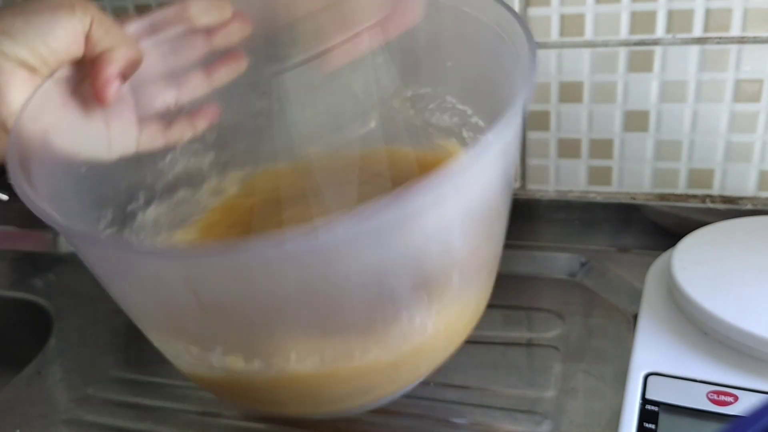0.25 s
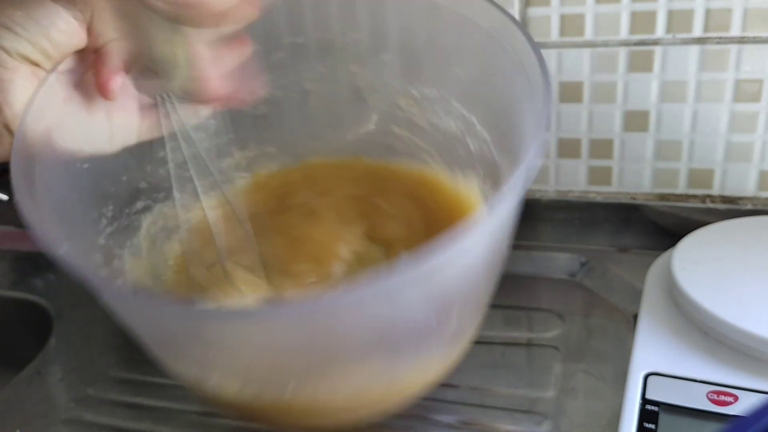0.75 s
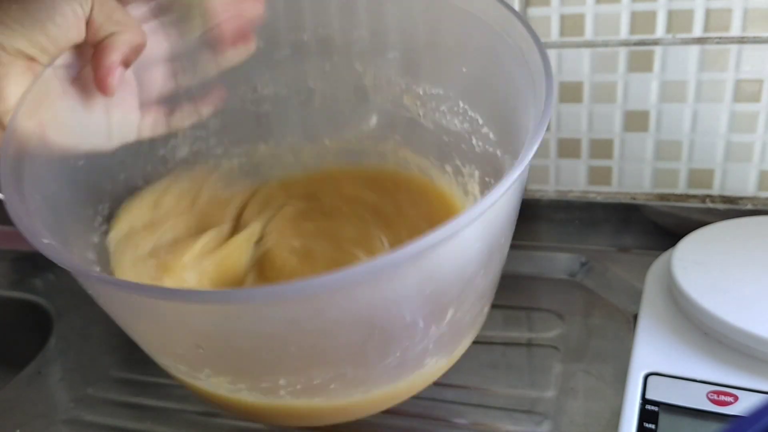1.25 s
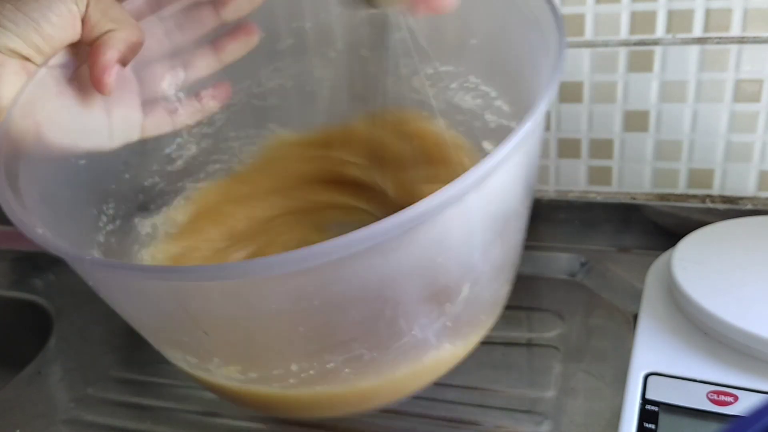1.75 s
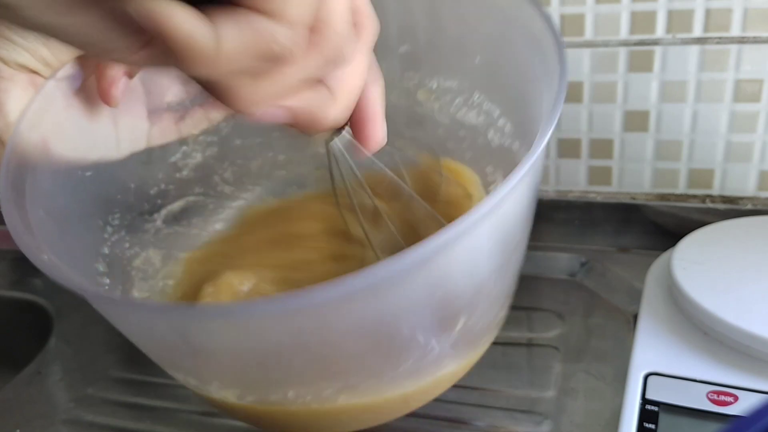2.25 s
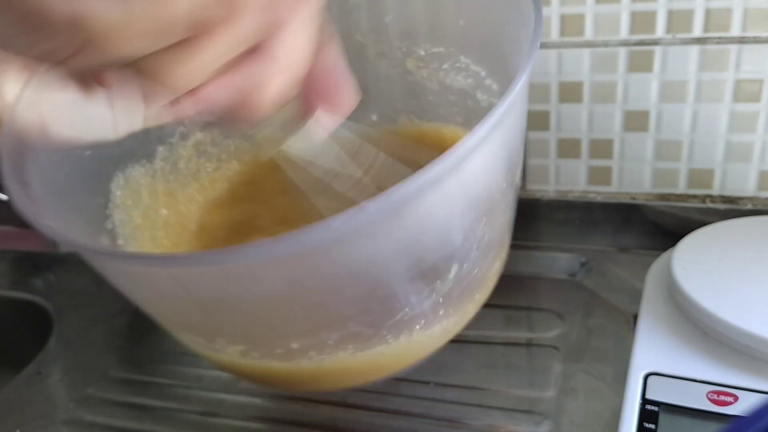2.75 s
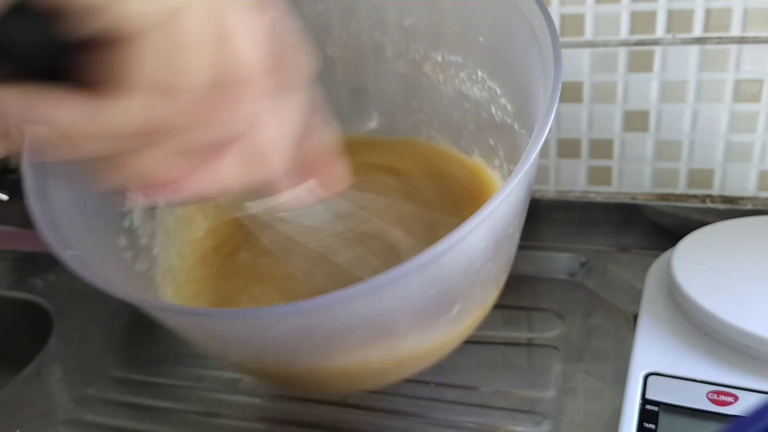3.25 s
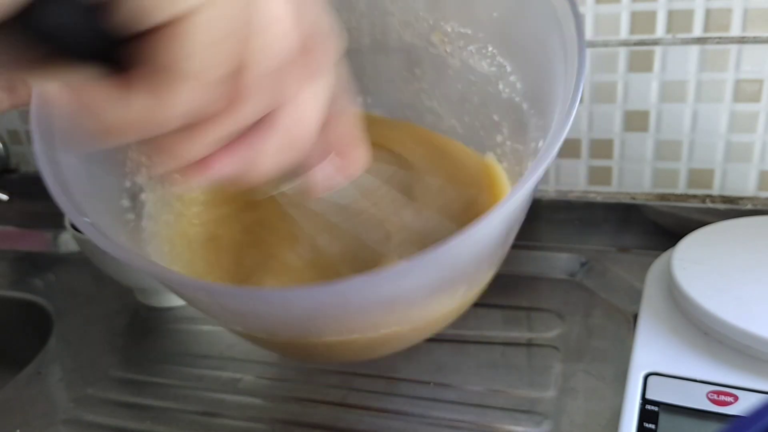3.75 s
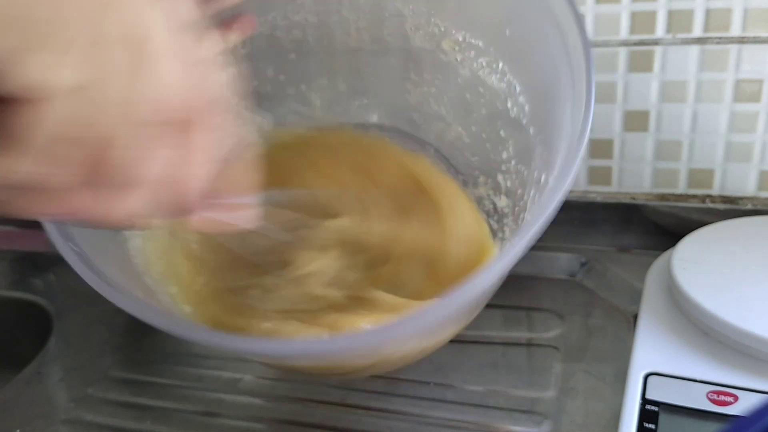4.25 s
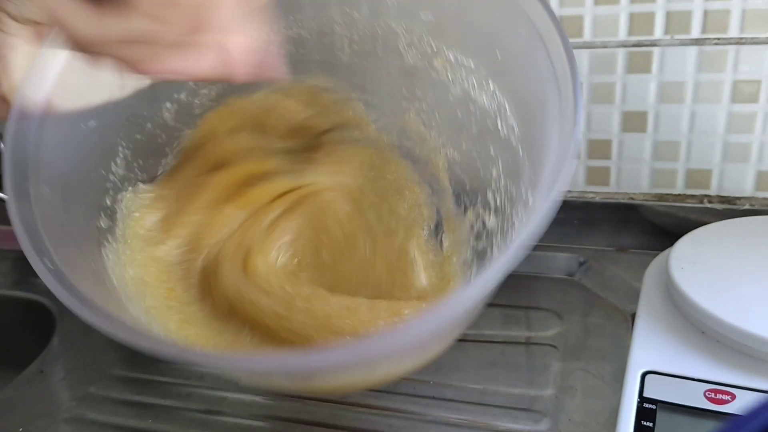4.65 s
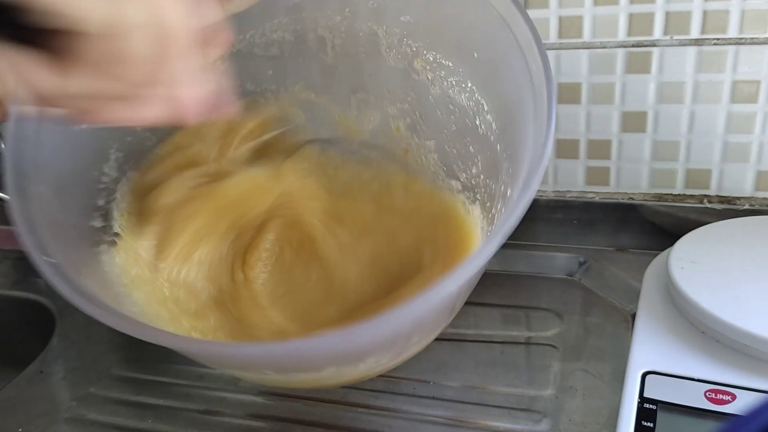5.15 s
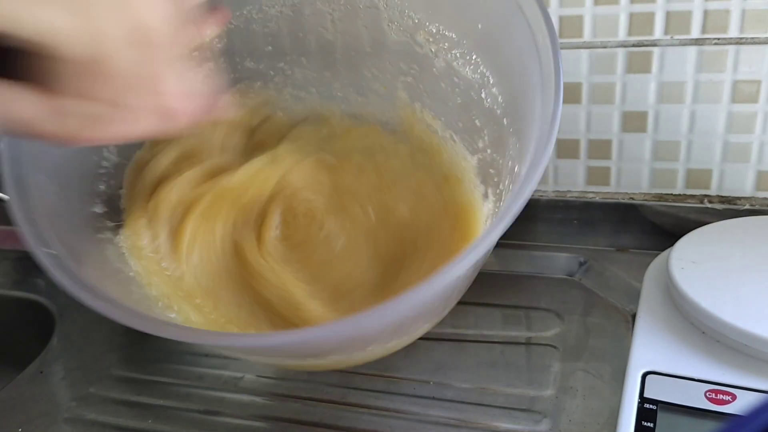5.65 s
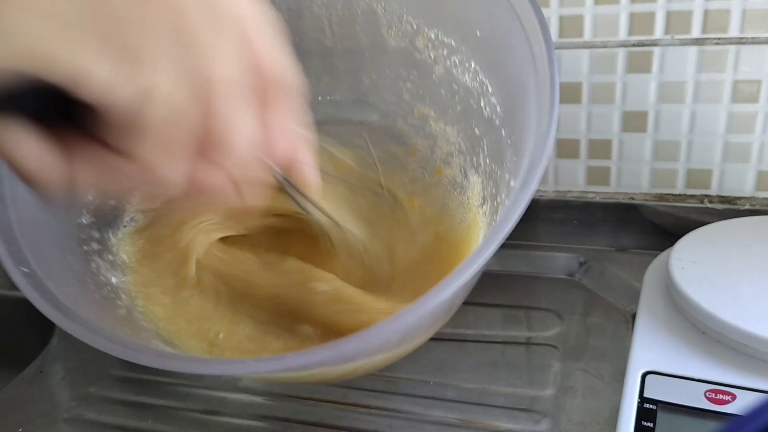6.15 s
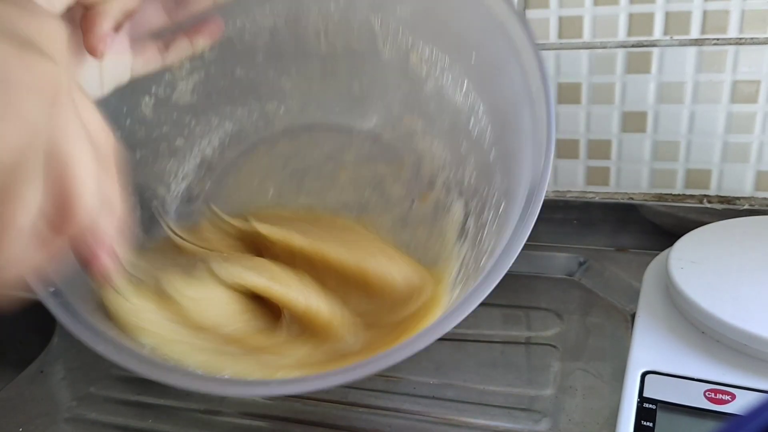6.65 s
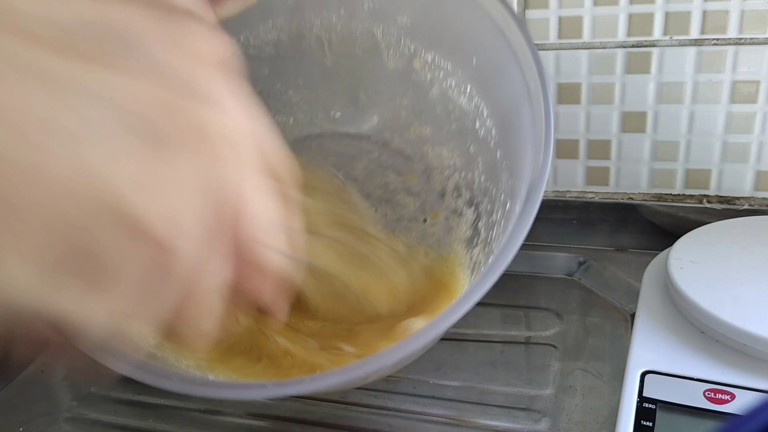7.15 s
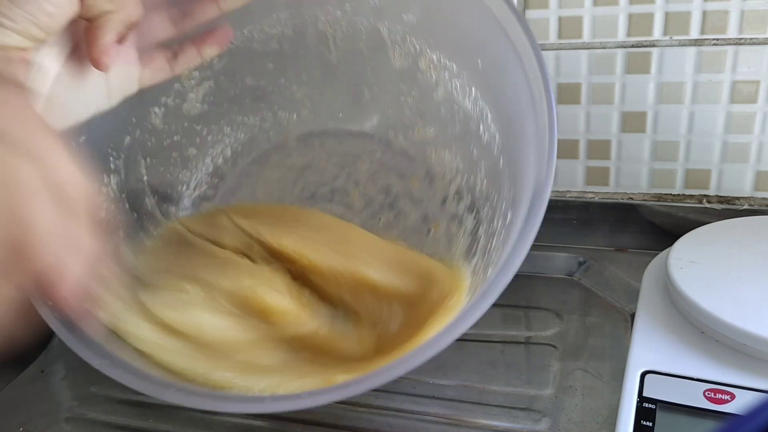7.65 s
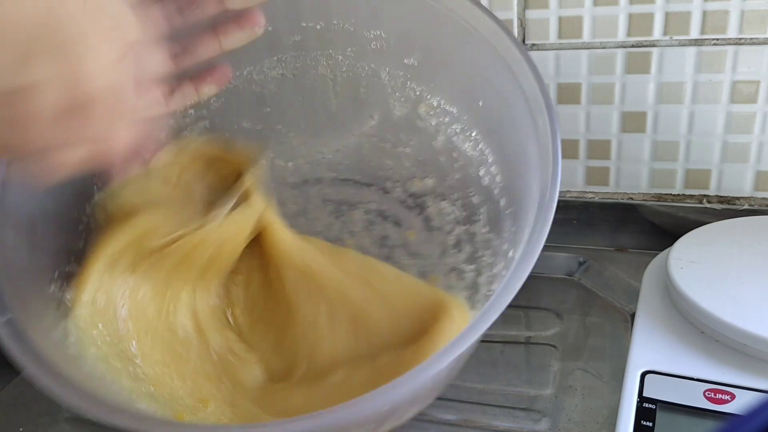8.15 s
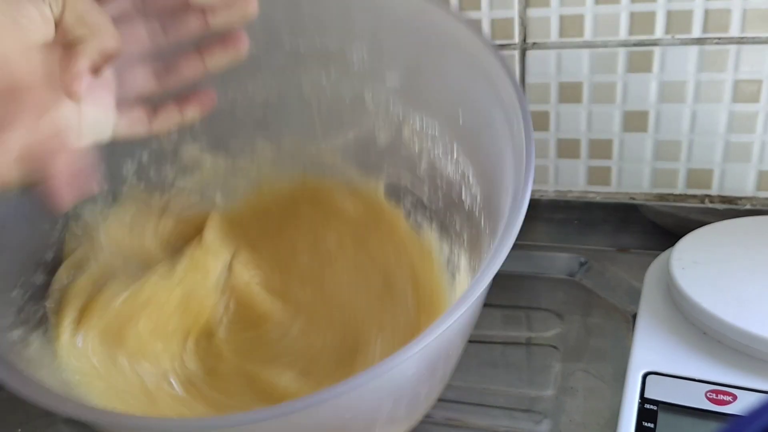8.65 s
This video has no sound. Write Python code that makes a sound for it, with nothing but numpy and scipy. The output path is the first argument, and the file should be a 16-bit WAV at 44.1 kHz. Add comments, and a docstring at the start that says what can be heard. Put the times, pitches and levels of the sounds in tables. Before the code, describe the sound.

A wire whisk beats eggs and sugar in a plastic bowl throughout, at four to five turns a second, heard close up in a tiled kitchen with a short echo. For the first 2.4 seconds it goes side to side: wires clack on the plastic, sugar hisses grittily and the batter churns with small gulps and soft low thuds. From about 2.4 seconds it circles, giving a smoother rhythmic scrape and slurp with few knocks. Tiny squeaks come near 2.3, 3.4 and 5.2 seconds. At 3.3 seconds the bowl bumps hard on a steel draining board with a short, low boom. From 6.3 seconds the whisk lifts and plunges, slapping the batter with wet plops while its loops tick together. At about 8.4 seconds there is a dull thump and the side-to-side clacking returns until the end, near 9 seconds.

```python
"""A wire whisk beats eggs and sugar in a hand-held plastic bowl, in a tiled kitchen, 4-5 turns a second.
It starts from side to side: the wires clack on the bowl, rub its wall, grind sugar and churn the batter.
At 2.3 s comes the first of a few squeaks, and from 2.4 s the whisk goes in circles. At 3.3 s the bowl
bumps hard on the steel draining board. From 6.3 s the whisk lifts and plunges, slapping the batter while
its loops tick together. From 8.4 s it beats from side to side again. A phone listens from close by."""
import sys
import numpy as np
from scipy import signal
from scipy.fft import rfft, irfft
from scipy.io import wavfile
from scipy.ndimage import uniform_filter1d

SR = 44100
rng = np.random.default_rng(int(sys.argv[2]) if len(sys.argv) > 2 else 0)


def wav_record(signal):
    """Record a signal, one row per channel, as 16-bit PCM in the file named by sys.argv[1]."""
    frames = np.transpose(np.atleast_2d(signal))
    bounded = np.clip(frames, -1, 1)
    # unit amplitude maps onto the largest positive 16-bit level
    quanta = np.round(bounded * 32767).astype(np.int16)
    wavfile.write(sys.argv[1], SR, quanta)


N = 392049
TIME = np.arange(N) / SR


def undb(db):
    """Turn decibels into a number to multiply by."""
    return 10 ** (np.asarray(db) / 20)


def unit(x):
    """Scale a signal to an average strength (rms) of 1."""
    return x / np.sqrt(np.mean(x ** 2))


def drift(rate):
    """A smooth random wobble that changes about rate times a second."""
    hold = max(2, int(SR / rate))
    steps = np.repeat(rng.standard_normal(N // hold + 1), hold)
    return unit(uniform_filter1d(steps, hold)[:N])


def swell(middle_s, length_s, time):
    """A bell-shaped rise and fall, length_s wide at half height."""
    return np.exp(-np.log(2) * np.minimum((2 * (time - middle_s) / length_s) ** 2, 100))


def fade(t, ring_s):
    """A ring dying away: 60 dB quieter after ring_s."""
    return np.exp(-np.log(1000) * t / ring_s)


def ring(force, resonances):
    """Shake an object that favours some pitches, its resonances: pitch_hz, width_hz, level_db."""
    size = 4096
    hz = np.arange(size // 2 + 1) * SR / size
    power = sum(undb(db) ** 2 / (1 + (2 * (hz - f) / width) ** 2) ** 2 for f, width, db in resonances)
    cepstrum = irfft(np.log(power) / 2)
    cepstrum[1:size // 2] *= 2  # folded so the ring comes after the push, never before
    cepstrum[size // 2 + 1:] = 0
    response = irfft(np.exp(rfft(cepstrum)))
    return signal.fftconvolve(force, response / np.linalg.norm(response))[:N]


def moving_ring(force, pitch_hz, width_hz):
    """Shake a single resonance whose pitch moves."""
    carrier = np.exp(2j * np.pi * np.cumsum(pitch_hz) / SR)
    pole = np.exp(-np.pi * width_hz / SR)
    slow = signal.lfilter([(1 - pole) ** 2], [1, -2 * pole, pole ** 2], force / carrier)
    return np.real(carrier * slow) * np.sqrt(8 * SR / (np.pi * width_hz))


def strike(hits, tones, contact_s):
    """Soft hits set an object's tones ringing; neighbouring tones swing opposite ways."""
    t = np.arange(SR // 2) / SR
    boom = sum((-1) ** k * undb(db) * fade(t, ring_s) * np.sin(2 * np.pi * hz * t)
               for k, (hz, db, ring_s) in enumerate(tones))
    force = np.zeros(N)
    for start, db in hits:
        force[int(start * SR)] = undb(db)
    return signal.fftconvolve(force, boom * (1 - np.exp(-t / contact_s)))[:N]


def blows(hits, chatter_db=4.5):
    """The force of whisk hits: one wire loop lands and its neighbours chatter after it."""
    force = np.zeros(N + SR)
    t = np.arange(SR // 20) / SR
    for start, db, chatter_s in hits:
        chatter = rng.laplace(size=len(t)) * np.sqrt(t) * np.exp(-t / chatter_s)
        blow = undb(chatter_db) * chatter / np.linalg.norm(chatter)
        blow[0] += 1
        at = int(start * SR)
        force[at:at + len(t)] += undb(db) * blow / np.linalg.norm(blow)
    return force[:N]


def notes(rows, waver, glide):
    """Short wavering notes; each second they rise by glide times their pitch."""
    out = np.zeros(N)
    clock = np.cumsum(1 + waver * drift(300)) / SR
    for middle, length, hz, db in rows:
        near = slice(max(int((middle - .1) * SR), 0), int((middle + .1) * SR))
        t = clock[near] - clock[int(middle * SR)]
        loudness = undb(db) * np.sqrt(2 * swell(middle, length, TIME[near]))
        out[near] += loudness * np.sin(2 * np.pi * hz * (t + glide * t ** 2 / 2))
    return out


def house_noise(level_db, top_hz):
    """The faint, dull noise of the house."""
    low_band = signal.butter(1, [50, top_hz], "band", fs=SR, output="sos")
    return undb(level_db) * unit(signal.sosfilt(low_band, rng.standard_normal(N)))


# how long the kitchen echoes, from low to high: pitch_hz, ring_s
ECHO_TIMES = [(150, 0.45), (530, 0.32), (1400, 0.27), (3000, 0.25), (7000, 0.23)]
def kitchen(sound, echo_db, build_s):
    """Sound bounces off tiles and steel; the echoes shift as hand and bowl circle."""
    t = np.arange(SR // 2) / SR
    hz = np.arange(len(t) // 2 + 1) * SR / len(t)
    centres_hz, ring_times = np.transpose(ECHO_TIMES)
    angle = 2 * np.pi * np.interp(TIME, np.array(WHISK_TURNS)[:, 0], np.arange(len(WHISK_TURNS)))
    echo = 0
    for facing in np.cos(angle), np.sin(angle):
        noise, tail = rfft(rng.standard_normal(len(t))), 0
        for share, ring_s in zip(np.eye(len(centres_hz)), ring_times):
            band = irfft(noise * np.interp(hz, centres_hz, share), len(t))
            tail += band * fade(t, ring_s)
        tail *= np.minimum(t / build_s, 1) ** 2
        echo += signal.fftconvolve(sound * facing, tail / np.linalg.norm(tail))[:N]
    echo_gain = undb(echo_db)
    return (sound + echo_gain * echo) / np.sqrt(1 + echo_gain ** 2)


# the bowl jolts in the hand: start_s, level_db
HAND_JOLTS = [(.5, -38), (.93, -28), (1.025, -22), (1.15, -28), (1.24, -29), (1.392, -22.5), (1.84, -35),
              (2.53, -28), (8.462, -13)]
def hand_jolts():
    """The bowl jolts against the hand, which stops the two low tones at once."""
    return strike(HAND_JOLTS, [(68, -0.29, 0.024), (126, -1.1, 0.034)], contact_s=0.0033)


# the bowl meets the draining board: start_s, level_db
BOARD_BUMPS = [(2.305, -35), (3.294, -10)]
# tones of the board with the bowl on it: pitch_hz, level_db, ring_s
BOARD_TONES = [(106, -5, 0.22), (125, -8, 0.36), (170, -10, 0.32), (212, 1.5, 0.14), (242, -2, 0.17),
               (304, -4.5, 0.12), (420, -4.5, 0.034), (690, -5.5, 0.026), (1026, -8.5, 0.048)]
def board_bumps():
    """The steel draining board booms when the bowl bumps it, first faintly, then hard."""
    return strike(BOARD_BUMPS, BOARD_TONES, contact_s=0.00043)


# squeaks on the plastic: middle_s, length_s, pitch_hz, level_db
WIRE_SQUEAKS = [(2.273, 0.014, 1240, -23.5), (2.287, 0.0046, 1200, -17), (3.372, 0.0061, 1256, -19.5),
                (5.153, 0.0095, 1212, -23)]
def squeaks():
    """A wire sticks and slips on the wall of the bowl."""
    return notes(WIRE_SQUEAKS, waver=0.019, glide=0)


# low gulps, then higher slurps: middle_s, length_s, pitch_hz, level_db
AIR_GULPS = [(.19, 0.027, 492, -19.5), (.388, 0.018, 468, -25.5), (.598, 0.019, 497, -24.5),
             (.816, 0.023, 520, -26.5), (1.268, 0.017, 514, -30.5), (1.497, 0.013, 487, -30),
             (1.722, 0.034, 507, -30), (4.31, 0.009, 513, -24), (4.365, .03, 519, -26.5),
             (4.62, 0.03, 513, -31), (5.168, 0.02, 537, -28.5), (5.868, 0.012, 522, -27),
             (5.99, 0.0098, 508, -29.5), (6.8, 0.021, 542, -33), (6.998, 0.011, 523, -27.5),
             (7.426, 0.012, 455, -23.5), (7.63, 0.014, 383, -26.5), (7.66, 0.012, 540, -31),
             (8.08, 0.012, 504, -27), (8.58, 0.0064, 522, -20.5)]
BATTER_SLURPS = [(2.615, 0.028, 1310, -28.5), (3.025, 0.032, 1055, -30.5), (4.39, 0.023, 1270, -34),
                 (5.42, 0.036, 1325, -34), (5.56, 0.023, 1940, -37), (5.77, 0.033, 1804, -33),
                 (5.92, 0.028, 1241, -30.5), (6.03, .03, 1970, -32.5), (6.16, 0.028, 1374, -28)]
def gulps_and_slurps():
    """Air scooped under the batter gulps; batter surging round the wall slurps. Both rise in pitch."""
    gulps = undb(-2.5) * notes(AIR_GULPS, waver=0.074, glide=3.4)
    return gulps + notes(BATTER_SLURPS, waver=0.085, glide=2)


# the wire loops touch each other: start_s, level_db
LOOP_TICKS = [(6.275, -23), (6.849, -40), (6.872, -31), (6.893, -28), (6.906, -29), (7.067, -31),
              (7.108, -32), (7.274, -28.5), (7.444, -32.5), (7.473, -27), (7.488, -25.5), (7.666, -27),
              (7.682, -23), (7.696, -24), (7.869, -27), (8.075, -31.5), (8.1, -30.5), (8.309, -30),
              (8.329, -30), (8.356, -30)]
# resonances of a tick: pitch_hz, width_hz, level_db
TICK_RESONANCES = [(1830, 400, -4.5), (2230, 330, 0.5), (2720, 500, 0), (3124, 150, -3)]
def loop_ticks(chatter_s):
    """The loops tick together, muffled by batter. Gives the force and its sound."""
    force = undb(25) * blows([(start, db, chatter_s) for start, db in LOOP_TICKS])
    return force, ring(force, TICK_RESONANCES)


# the whisk lands, often after a lighter touch of its front loop: start_s, level_db
BATTER_SLAPS = [(6.57, -43), (6.6, -21.5), (6.783, -39), (6.808, -23), (6.99, -33), (7.007, -22),
                (7.195, -31), (7.209, -25), (7.398, -31.5), (7.414, -22.5), (7.605, -28.5), (7.621, -21.5),
                (7.809, -26), (7.822, -24.5), (8.009, -34.5), (8.024, -21), (8.226, -34), (8.237, -22.5)]
# resonances of the dent left in the batter: pitch_hz, width_hz, level_db
DENT_RESONANCES = [(245, 210, -8), (493, 340, -1.5), (1020, 390, -4), (1190, 250, 0), (2060, 1540, -8.5)]
def batter_slaps(chatter_s):
    """The lifted whisk slaps back into the batter with a plop. Gives the force and its sound."""
    force = undb(26.5) * blows([(start, db, chatter_s) for start, db in BATTER_SLAPS])
    return force, ring(force, DENT_RESONANCES)


# the hardest knocks on the bowl: start_s, level_db, cushion (0 bare plastic, 1 thick batter), chatter_s
BOWL_CLACKS = [(0.157, -16, 0, 0.0018), (.193, -16, 0.4, 0.004), (0.208, -20.5, 0, 0.0022),
               (0.282, -18.5, 0.67, 0.0052), (0.302, -18, 0.2, 0.0019), (.397, -25.5, 0.86, 0.0051),
               (0.428, -20.5, 0, 0.0023), (0.491, -18.5, 0.37, 0.0028), (.5, -19.5, 0.75, 0.006),
               (0.633, -24, 0.04, 0.005), (0.7, -21.5, 0.83, 0.007), (0.749, -17.5, 0.35, 0.0018),
               (.811, -27, 0.3, 0.0055), (.862, -23, 0, 0.0016), (0.928, -22.5, 0.83, 0.0044),
               (1.017, -18, 0.5, 0.0011), (1.046, -19.5, 0.82, 0.0071), (1.15, -19.5, 0.86, 0.0045),
               (1.389, -19.5, 0.6, 0.0042), (1.508, -27, 0.83, .008), (1.531, -18.5, 0, 0.0027),
               (1.609, -24, 0.7, 0.0047), (1.84, -18, 0.49, 0.0047), (1.996, -25, 0, 0.0026),
               (2.078, -17, 0.18, 0.0008), (2.163, -28.5, 0.9, .002), (2.305, -14, 0.53, 0.0033),
               (2.387, -22, 0.9, 0.02), (2.528, -20, 0.22, 0.0077), (2.599, -34, 1, 0.008),
               (4.757, -26.5, 0.9, 0.0037), (4.949, -16.5, 0.32, 0.0072), (6.392, -20.5, 0.84, 0.0045),
               (6.488, -30.5, 0.45, 0.0065), (6.673, -22.5, 0.09, 0.0084), (6.862, -25.5, 0.62, 0.0068),
               (7.057, -23.5, 0.1, 0.0051), (7.26, -28, 0.6, 0.0043), (7.881, -21, 0.54, 0.0032),
               (8.442, -21, 0.82, 0.0019), (8.463, -15, 0.47, 0.0038), (8.485, -17.5, 0.1, 0.0043),
               (8.578, -23, 0.63, 0.002), (8.692, -21.5, 0.82, 0.0014), (8.71, -25, 0.5, 0.0042)]
def clacks():
    """The force of each knock; a cushion of batter shifts it from the wires to the bowl."""
    forces = []
    for bare_db, cushioned_db in (-18, -2), (-15.5, 3.5), (-0.5, -1.5):  # on batter, wall, wires
        forces.append(blows([(start, db + bare_db + cushion * (cushioned_db - bare_db), chatter_s)
                             for start, db, cushion, chatter_s in BOWL_CLACKS]))
    return undb(28) * np.array(forces)


# the knocked wall's note, lower once batter coats it: time_s, pitch_hz
WALL_NOTE = [(1.2, 1286), (6.3, 1220)]
# tones of the wires after a knock on bare plastic: pitch_hz, level_db, ring_s
WIRE_TONES = [(1660, -8.5, .15), (1960, 3.5, .2), (2250, 0.5, 0.079), (2750, 4.5, 0.2), (2940, -3, .13)]
def after_ring(wall_db, wall_ring_s, wires_db):
    """After a knock the wall rings on if batter cushioned it, the wires if not."""
    wall = np.zeros(N + SR)
    t = np.arange(SR // 2) / SR
    for start, db, cushion, _ in BOWL_CLACKS:
        hz = np.interp(start, *np.transpose(WALL_NOTE))
        note = fade(t, wall_ring_s) * np.sin(2 * np.pi * hz * t)
        at = int(start * SR)
        wall[at:at + len(t)] += undb(db + wall_db) * cushion * note
    bare_hits = [(start, db + wires_db) for start, db, cushion, _ in BOWL_CLACKS if cushion < .5]
    return wall[:N] + strike(bare_hits, WIRE_TONES, contact_s=0.00086)


# resonances of the sugar's hiss: pitch_hz, width_hz, level_db
SUGAR_RESONANCES = [(4040, 1880, -6.5), (5106, 680, -5), (6240, 800, -0.5), (6720, 990, -0.5),
                    (7420, 650, -0.5)]
def sugar_hiss(force, gain_db, pivot_db, growth):
    """Crystals crunch under the wires; the hiss grows more slowly than the force, and its top flickers."""
    pressure = np.maximum(uniform_filter1d(force ** 2, SR // 50), 1e-9) / undb(pivot_db) ** 2
    crunch = force * pressure ** ((growth - 1) / 2)
    hiss = ring(crunch, SUGAR_RESONANCES)
    dull = signal.sosfiltfilt(signal.butter(4, 5900, fs=SR, output="sos"), hiss)
    tilt = undb(1.5 * drift(30))
    return undb(gain_db) * (dull * tilt + (hiss - dull) / tilt)


def turn_start():
    """For every moment, the time at which the current turn of the whisk began."""
    starts = np.array(WHISK_TURNS)[:, 0]
    return starts[np.maximum(np.searchsorted(starts, TIME, side="right") - 1, 0)]


def sloshing(start_hz, rise):
    """A pitch that climbs in each turn as the batter is pushed aside, then drops back."""
    pitch_hz = start_hz * np.exp(rise * np.minimum(TIME - turn_start(), .2))
    return uniform_filter1d(pitch_hz, SR // 40) * (1 + 0.025 * drift(25))


# weaker resonances of the bowl's hollow with batter in it: pitch_hz, width_hz, level_db
HOLLOW_RESONANCES = [(68, 56, -14.5), (169, 110, -16), (237.6, 64, -11), (301.4, 75, -9),
                     (386.7, 51.4, -2.5), (592, 60, -7.5), (677, 124, -11)]
def bowl_hollow(force):
    """Churned batter makes the hollow of the bowl ring; its main pitch moves with the sloshing."""
    pitch_hz = sloshing(manner("hollow_hz"), manner("hollow_rise"))
    main = moving_ring(force, pitch_hz, width_hz=77)
    return undb(-2.5) * main + undb(-4.5) * ring(force, HOLLOW_RESONANCES)


# weaker resonances of the plastic wall: pitch_hz, width_hz, level_db
WALL_RESONANCES = [(884, 42, -13), (960, 340, -8.5), (1100, 160, -6.5), (1582, 276, -10.5)]
def bowl_wall(force):
    """The rubbed and knocked plastic rings; its main pitch moves with the sloshing."""
    pitch_hz = sloshing(manner("wall_hz"), manner("wall_rise"))
    main = moving_ring(force, pitch_hz, width_hz=115)
    return undb(-1.4) * main + undb(-4) * ring(force, WALL_RESONANCES)


# resonances of the whisk's wires on the plastic: pitch_hz, width_hz, level_db
CAGE_RESONANCES = [(1750, 420, -2), (1790, 36, -13.5), (2238, 770, 0.5), (2730, 310, 1), (3037, 350, -4.5),
                   (3374, 260, -10.5)]
def wire_cage(rub, knock):
    """The wires ring, and gaps in the batter open and close between them with a sliding squelch."""
    gaps = [moving_ring(rub, hz * np.exp(0.083 * drift(19)), width_hz=125) for hz in (1800, 2300)]
    squelch = sum(gaps) / np.sqrt(len(gaps))
    return undb(-1.57) * ring(rub + knock, CAGE_RESONANCES) + undb(-7.5) * squelch


# the air pocket's pitch as a turn starts: time_s, pitch_hz
POCKET_NOTE = [(0, 873), (1.3, 850), (2.5, 930), (3.8, 850), (5.5, 852), (8.5, 934)]
# its resonances: pitch_multiple, width_hz, boost_db
POCKET_RESONANCES = [(0.471, 69.4, -10.5), (0.998, 139, -3.5), (2.15, 307, -17)]
def air_pocket(sound, rise, gain_db):
    """The pocket of air dragged behind the whisk closes in each turn, so its resonances slide up."""
    began = turn_start()
    start_hz = np.interp(began, *np.transpose(POCKET_NOTE))
    pitch_hz = start_hz * np.exp(rise * np.minimum(TIME - began, .25))
    out = sound.copy()
    for multiple, width_hz, db in POCKET_RESONANCES:
        carrier = np.exp(2j * np.pi * np.cumsum(multiple * pitch_hz) / SR)
        pole = np.exp(-np.pi * width_hz / SR)
        slow = signal.lfilter([1 - pole], [1, -pole], sound / carrier)
        out += 2 * undb(db) * np.real(carrier * slow)
    return out * undb(gain_db)


def bubbles(rate, fade_s, glide, spread_db, low_hz=250, high_hz=3400):
    """Beaten-in air pops in short rising notes, rate of them a second."""
    t = np.arange(SR // 20) / SR
    out = np.zeros(N + len(t))
    for when, pitch, life, size in rng.random((int(rate * N / SR), 4)):
        hz = low_hz + pitch * (high_hz - low_hz)
        life_s = fade_s * (.5 + life) * np.sqrt(high_hz / hz)  # big, low bubbles ring longer
        loudness = (1 - np.exp(-2 * t / life_s)) * np.exp(-t / life_s)
        note = loudness * np.sin(2 * np.pi * hz * (t + glide * t ** 2 / 2))
        at = int(when * N)
        out[at:at + len(t)] += undb(spread_db * size) * note / np.linalg.norm(note)
    return unit(out[:N]) * np.sqrt(2 * (high_hz - low_hz) / SR)  # as strong per hertz as noise of rms 1


def grains(rate, spread_db):
    """Tiny clicks of uneven size at random moments, about rate of them a second."""
    clicks = (rng.random(N) < rate / SR) * rng.choice([-1, 1], N)
    return unit(clicks * undb(spread_db * np.clip(rng.standard_normal(N), -2, 2)))


def snags(rate, fade_s, spread_db):
    """Pressure that jumps each time a wire catches, then fades; it averages 1."""
    times = np.cumsum(rng.gamma(2, .5 / rate, int(2 * rate * N / SR)))
    at = (times[times < N / SR] * SR).astype(int)
    jumps = np.zeros(N)
    jumps[at] = undb(2 * spread_db * np.clip(rng.standard_normal(len(at)), -2, 2))
    pressure = signal.lfilter([1], [1, -np.exp(-1 / (fade_s * SR))], jumps)
    return pressure / pressure.mean()


# ways to whisk: "beat" (side to side), "circle" (round the wall), "whip" (plunge, scrape, lift). Each has
#   out, back (the two strokes): length_s, batter_db, wall_db, wires_db, sugar_db
#   lag_s: wait until the out stroke peaks; catch: share of force in snags; froth_db: popping air
#   wall_hz, hollow_hz: main pitches as a turn starts; wall_rise, hollow_rise: relative climb a second
WHISKING_WAYS = { "beat": dict(lag_s=0.028, catch=0.44, froth_db=-1, wall_hz=1270, wall_rise=0.025, hollow_hz=491.4, hollow_rise=0.85, out=(0.08, -35, -28, -29, -27.5),
                 back=(0.0523, -36, -32, -30, -30)),
                 "circle": dict(lag_s=0.033, catch=0.54, froth_db=-5, wall_hz=1162, wall_rise=0.49, hollow_hz=509, hollow_rise=0.4, out=(0.0821, -35, -28.5, -30, -32.5),
                 back=(0.0946, -33.5, -28.5, -33, -32.5)),
                 "whip": dict(lag_s=0.023, catch=0.67, froth_db=0.5, wall_hz=1185, wall_rise=0.38, hollow_hz=521, hollow_rise=0.68, out=(0.0354, -33, -36.5, -43.5, -41),
                 back=(0.063, -43.5, -36.5, -32, -30))}
# the hand changes its way: start_s, way_name
WAY_CHANGES = [(-1, "beat"), (2.4, "circle"), (6.3, "whip"), (8.4, "beat")]
def manner(key):
    """One setting of the hand's way of whisking, for every moment."""
    since, names = zip(*WAY_CHANGES)
    values = np.array([WHISKING_WAYS[name][key] for name in names])
    return values[np.searchsorted(since, TIME, side="right") - 1]


# turns of the whisk, each a stroke out and a stroke back: start_s, back_delay_s, out_db, back_db
WHISK_TURNS = [(-0.06, 0.15, 6, 2), (0.169, 0.13, 4.5, 2), (0.378, 0.14, 4, 1.5), (0.594, 0.11, 4, 3.5),
               (0.799, 0.17, 2.5, 3), (1.03, 0.16, 2.5, -0.5), (1.251, 0.17, 1.5, 1.5),
               (1.478, 0.16, 0.5, 0), (1.699, 0.15, -0.5, 1.5), (1.93, 0.15, 1, 1), (2.176, 0.13, -3, 0.5),
               (2.472, 0.17, -0.5, -0.5), (2.737, 0.17, -3, -1), (2.993, 0.16, -2, -1.5),
               (3.233, 0.14, -1, -0.5), (3.466, 0.17, 0, 0), (3.716, 0.17, 0, 0), (3.973, 0.17, 0.5, -1),
               (4.243, 0.15, -1, -2), (4.505, 0.12, -0.5, 1), (4.78, 0.14, -2.5, 1.5),
               (5.014, 0.16, -3, -2), (5.259, 0.14, 0, -1), (5.524, 0.15, 0.5, 0),
               (5.759, 0.15, -1.5, -1.5), (6.004, 0.17, -0.5, -1), (6.392, 0.085, -5.5, -14),
               (6.6, 0.1, -2, -12.5), (6.808, 0.072, -2, -0.5), (7.007, 0.067, -4.5, 0.5),
               (7.21, 0.06, 1, 0.5), (7.414, 0.067, -1, 1), (7.618, 0.062, 2.5, 1.5),
               (7.809, 0.083, -0.5, -2.5), (8.023, 0.076, 0.5, -0.5), (8.235, 0.094, 1, 3.5),
               (8.463, 0.14, -4, 1.5), (8.709, 0.14, -2, 0)]
# wires and sugar get louder or softer as the whisk rides higher or deeper: time_s, level_db
RIDE_LEVELS = [(0, 2.5), (1.5, 2), (2.1, -2), (2.8, 0), (3.5, -1.5), (4.4, 0), (4.9, 1), (6, 1),
               (6.6, -1.5), (8.8, 1.5)]
# the wires drag through a patch of undissolved sugar: middle_s, length_s, level_db
SUGAR_SCRAPES = [(0.418, 0.046, -28), (0.61, 0.024, -18), (0.817, .05, -29.5), (0.928, .008, -15.5),
                 (1.044, .02, -16), (1.235, 0.015, -23), (2.925, 0.023, -36), (3.482, 0.032, -27.5),
                 (3.913, 0.04, -28), (4.254, 0.024, -28), (4.527, 0.03, -25.5), (4.878, 0.04, -29),
                 (5.157, 0.031, -28.5), (5.79, 0.029, -30), (5.923, 0.036, -28.5), (6.881, 0.028, -28)]
def strokes(uneven_db, linger, grip, scrape_wires_db):
    """Power on batter, wall, wires and sugar: two swells a turn, no two quite alike."""
    coarse = TIME[::64]
    chance = rng.standard_normal((len(WHISK_TURNS), 2, 4))
    stretch = np.array([linger, linger, 1, grip])[:, None]  # batter and wall last longest, sugar least
    power = 0
    for (start, back_s, out_db, back_db), luck in zip(WHISK_TURNS, chance):
        way = [WHISKING_WAYS[name] for since, name in WAY_CHANGES if since <= start][-1]
        both = (way["lag_s"], out_db, way["out"]), (back_s, back_db, way["back"])
        for (delay, db, (length, *parts_db)), scatter in zip(both, luck):
            gains = undb(db + np.array(parts_db) + uneven_db * scatter)
            power += gains[:, None] ** 2 * swell(start + delay, length * stretch, coarse)
    power[2:] *= undb(np.interp(coarse, *np.transpose(RIDE_LEVELS))) ** 2
    for middle, length, db in SUGAR_SCRAPES:
        power[2:] += undb([[db + scrape_wires_db], [db]]) ** 2 * swell(middle, length, coarse)
    return [np.interp(TIME, coarse, row) for row in power]


def whisking():
    """Forces on batter, wall, wires and sugar as the loops drag and catch in grit and froth."""
    power = strokes(uneven_db=1.12, linger=1.047, grip=0.81, scrape_wires_db=-10.5)
    pressure = snags(rate=110, fade_s=0.0036, spread_db=5)
    froth = bubbles(rate=360, fade_s=0.0031, glide=3.97, spread_db=14) * undb(manner("froth_db"))
    catch = manner("catch")
    soft, hard = (np.sqrt(1 - share + share * pressure) for share in (0.46 * catch, catch))
    batter = grains(rate=2000, spread_db=2) * soft * undb(-3) + froth * undb(-0.5)
    wall = grains(rate=2400, spread_db=2.5) * soft * undb(-3.5) + froth * undb(-2)
    grit = grains(rate=5000, spread_db=3.5) * hard * undb(-0.98)
    wires = grit + froth * undb(-2)
    return np.sqrt(power) * [batter, wall, wires, grit]


def scene():
    """The whisk's forces ring the bowl, and the kitchen answers; both ears hear the same."""
    batter_rub, wall_rub, wire_rub, grinding = whisking()
    batter_knock, wall_knock, wire_knock = clacks()
    slap_force, plops = batter_slaps(chatter_s=0.0035)
    tick_force, ticks = loop_ticks(chatter_s=0.0018)
    bowl = bowl_hollow(batter_rub + batter_knock) + bowl_wall(wall_rub + wall_knock)
    bowl += wire_cage(wire_rub, wire_knock) + plops
    bowl = air_pocket(bowl, rise=3.55, gain_db=-2)
    bowl += gulps_and_slurps() + ticks + after_ring(wall_db=-2.5, wall_ring_s=0.12, wires_db=-15)
    crushing = grinding + undb(-2) * wire_knock + undb(-4.5) * slap_force + undb(-1) * tick_force
    hiss = sugar_hiss(crushing, gain_db=-6, pivot_db=-36, growth=0.75)
    sound = kitchen(bowl, echo_db=-8, build_s=0.0055) + kitchen(hiss, echo_db=-7, build_s=0.00072)
    sound += kitchen(squeaks() + board_bumps(), echo_db=-13, build_s=0.021)
    sound += hand_jolts() + house_noise(level_db=-56, top_hz=400)
    return np.tile(sound, (2, 1))


def record(dry, bass_hz=38, top_hz=7540):
    """The phone thins the deepest bass and cuts the highest sounds steeply."""
    thinned = signal.sosfilt(signal.butter(2, bass_hz, "high", fs=SR, output="sos"), dry)
    return signal.sosfilt(signal.ellip(14, .1, 85, top_hz, fs=SR, output="sos"), thinned)


dry = scene()
out = record(dry)
wav_record(out)
```